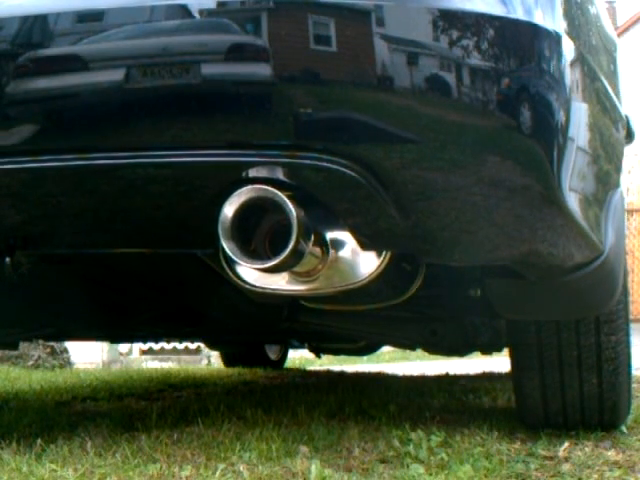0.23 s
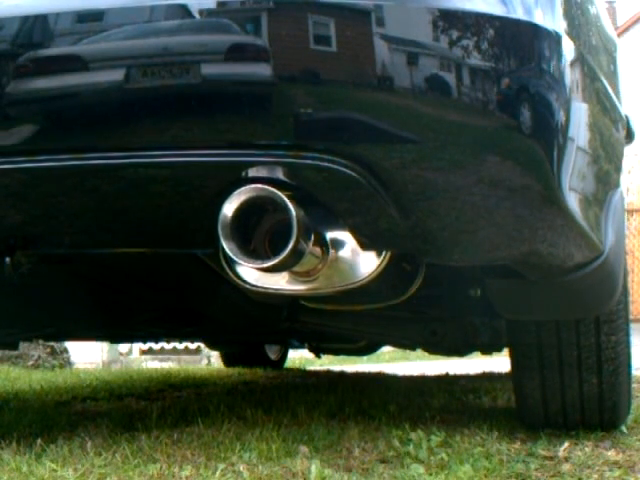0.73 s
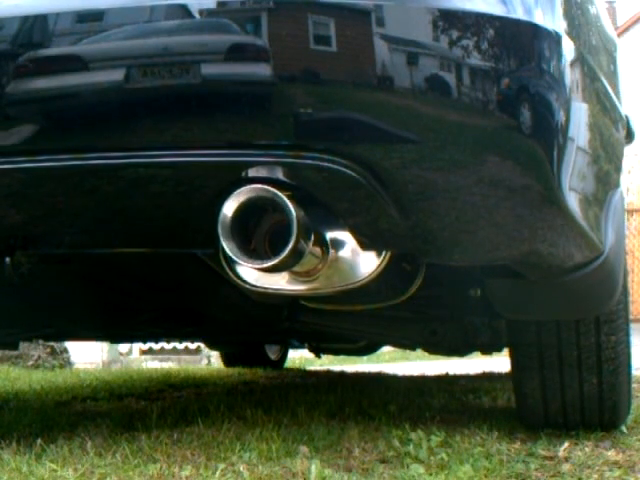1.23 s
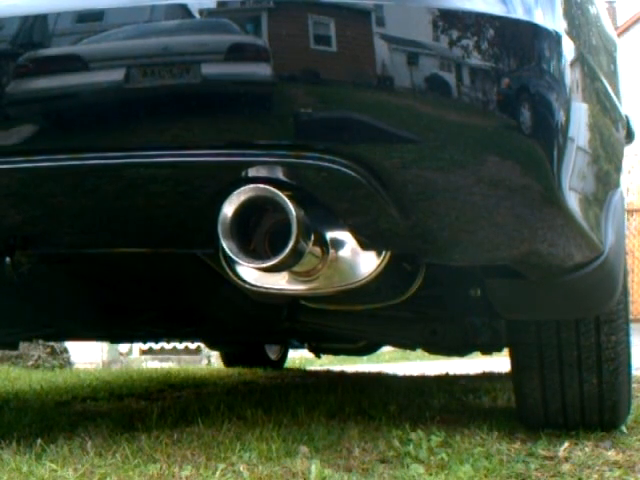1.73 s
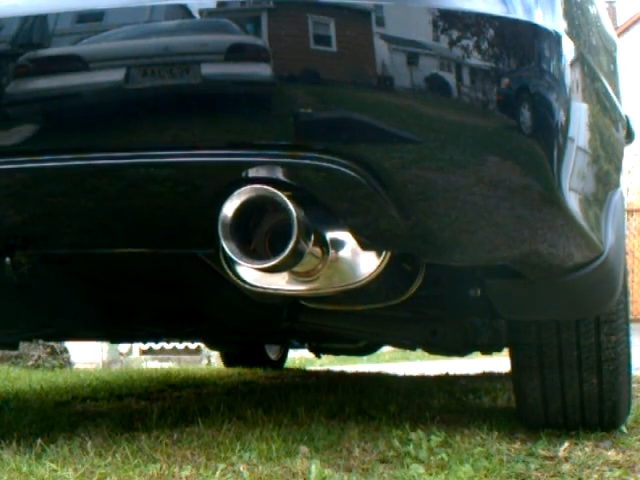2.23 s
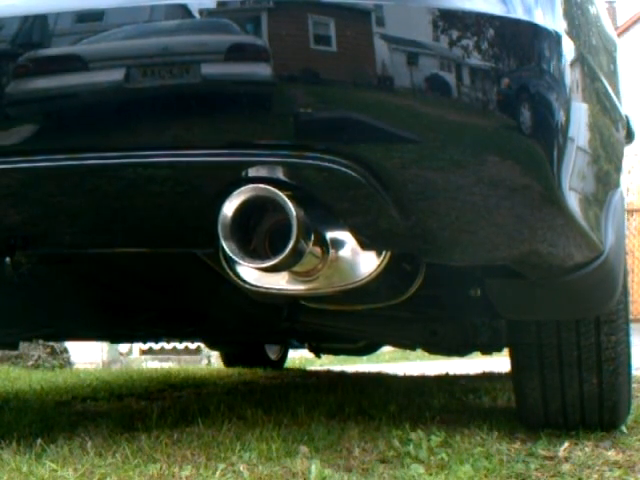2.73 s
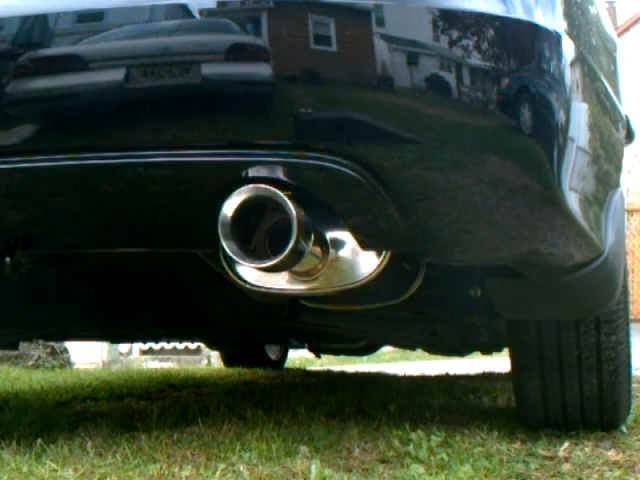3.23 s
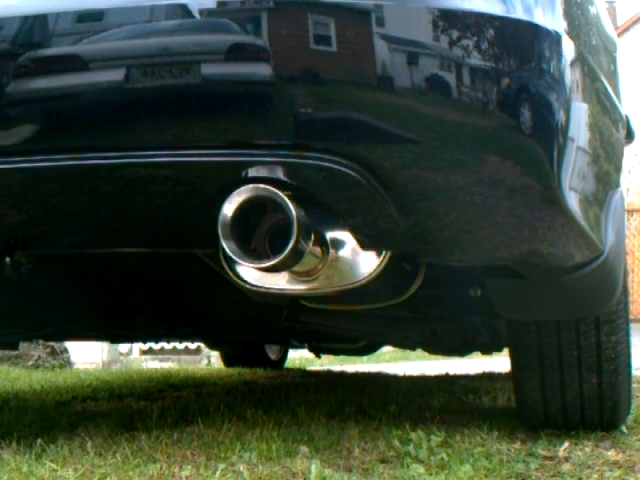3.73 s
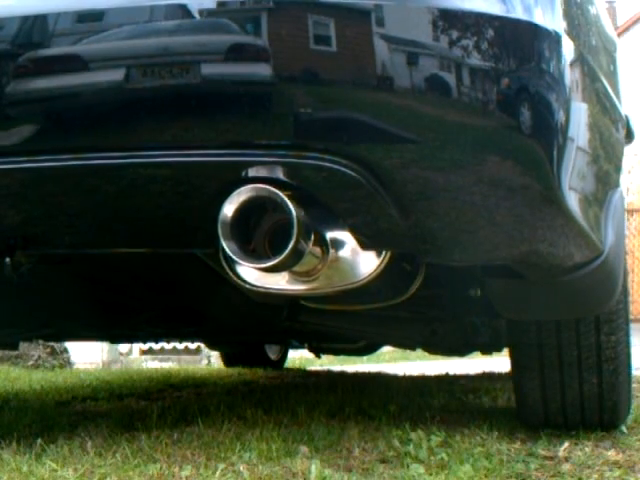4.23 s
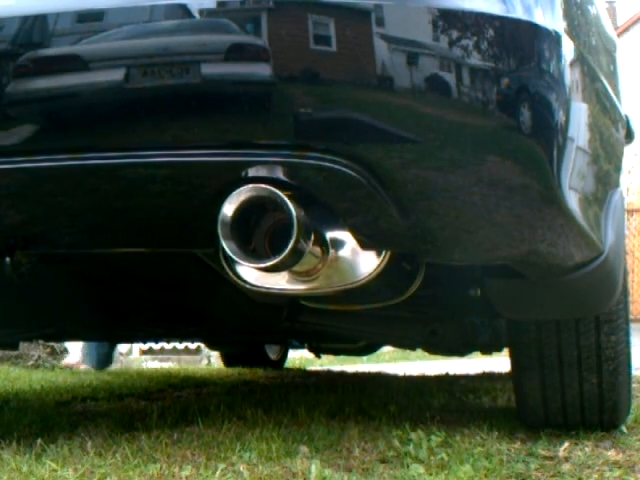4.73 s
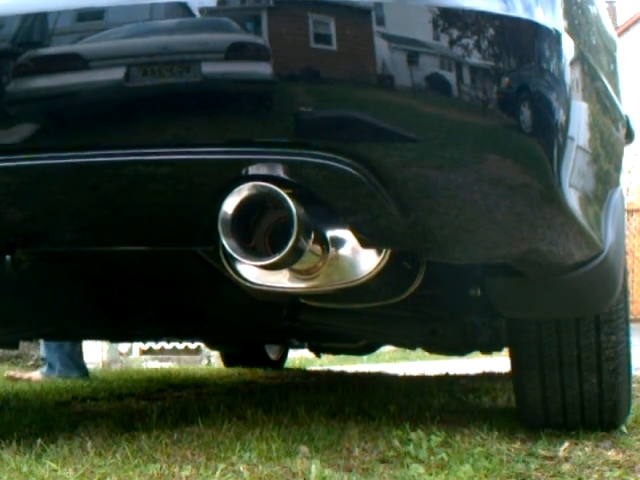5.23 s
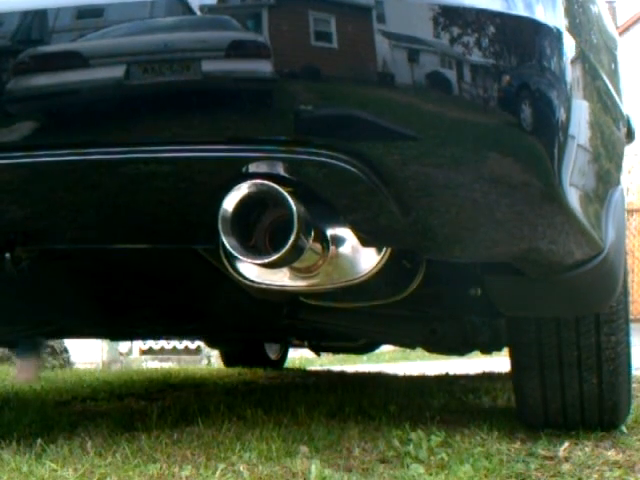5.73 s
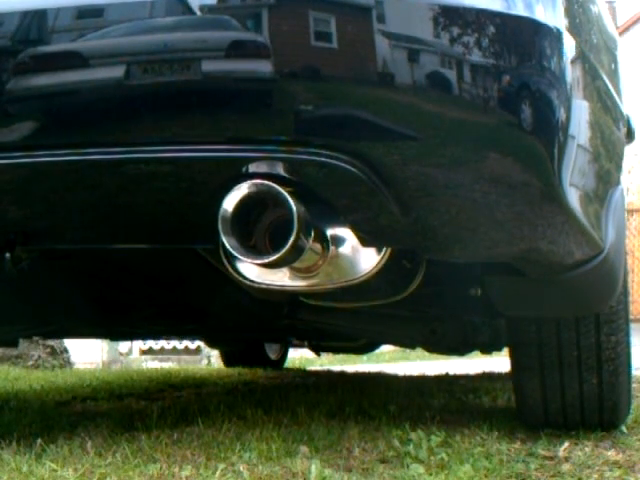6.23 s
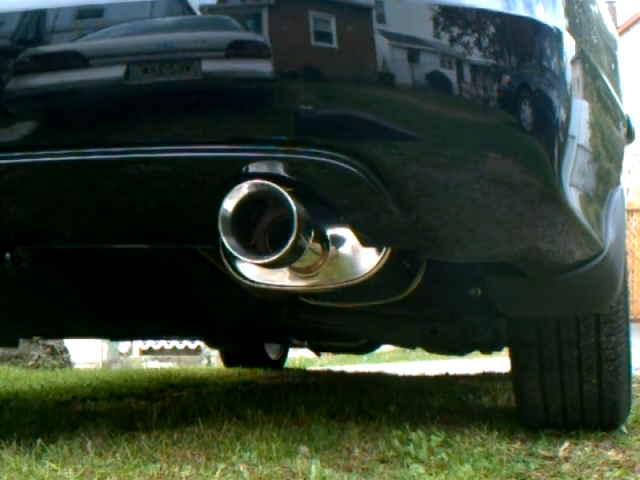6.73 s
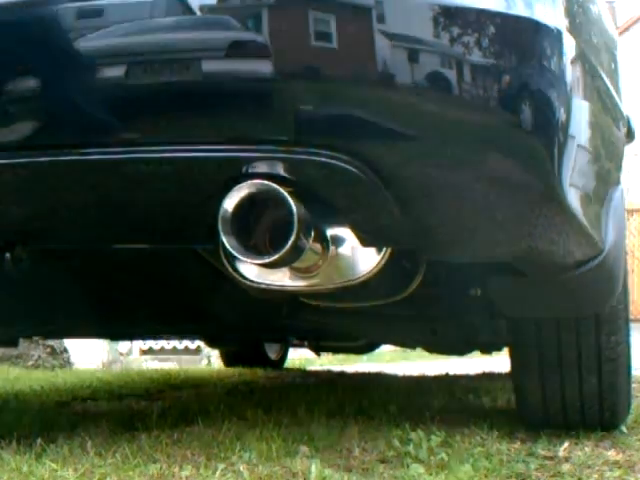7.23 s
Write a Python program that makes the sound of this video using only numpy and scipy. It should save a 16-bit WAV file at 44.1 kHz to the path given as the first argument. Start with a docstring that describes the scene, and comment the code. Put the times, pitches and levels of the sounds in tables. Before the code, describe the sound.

Close at a car's exhaust tip, a four-cylinder engine is blipped three times, each a booming raspy roar, then runs down to a soft puffing idle.

```python
"""Four-cylinder exhaust, three blips and a run-down

A car on a lawn, heard close to its exhaust tip, is blipped three times and then runs down to idle.
Firing pulses boom in the muffler and ring the pipe; gas hisses at the tip and cracks as the throttle opens.
A preamplifier clips the loudest peaks; the sound has little treble and carries a faint whine.
"""
import sys
import numpy as np
from scipy import signal
from scipy.fft import rfft, irfft, next_fast_len
from scipy.io import wavfile

SR = 44100
rng = np.random.default_rng(int(sys.argv[2]) if len(sys.argv) > 2 else 0)


def unload_audio(sound):
    """Save the sound as a 16-bit wav file, at the path given as the first command line argument."""
    columns = np.transpose(np.atleast_2d(sound))
    # keep every value between -1 and 1, then stretch to whole-number steps
    steps = np.round(np.clip(columns, -1, 1) * 32767)
    wavfile.write(sys.argv[1], SR, steps.astype(np.int16))


N = 329191
TIME = np.arange(N) / SR

# Blips of the pedal. Each row: throttle opens in seconds, engine catches in seconds,
# pedal lifts in seconds, drive in firings per second per second.
BLIPS = [(.315, .332, .631, 277.6), (1.365, 1.419, 1.591, 311), (2.205, 2.253, 2.465, 286.6)]
CRUISE_HZ = 100  # reference engine speed; all engine speeds are in firings per second


def amp(db):
    """Decibels to gain."""
    return 10 ** (np.asarray(db) / 20)


def unit(x):
    """Scales to rms 1."""
    return x / np.sqrt(np.mean(x ** 2) + 1e-20)


def noise(spectrum):
    """Noise of rms 1, coloured by (Hz, dB) points."""
    size = next_fast_len(N)
    hz, db = np.transpose(spectrum)
    log_hz = np.log(np.fft.rfftfreq(size, 1 / SR) + 1)
    gain = amp(np.interp(log_hz, np.log(hz), db))
    white = rng.standard_normal(size)
    return unit(irfft(rfft(white) * gain, size)[:N])


def drift(count):
    """Smooth chance of rms 1: count random points a second, joined by lines."""
    points = rng.standard_normal(count * N // SR + 2)
    return unit(np.interp(TIME * count, np.arange(len(points)), points))


def ramp(start_s, length_s):
    """Rises from 0 to 1 in a straight line."""
    return np.clip((TIME - start_s) / length_s, 0, 1)


def bell(centre_s, sigma_s):
    """Gaussian bump of height 1."""
    return np.exp(-((TIME - centre_s) / sigma_s) ** 2 / 2)


def ring(x, hz, width_hz):
    """One resonance of gain 1."""
    return signal.lfilter(*signal.iirpeak(hz, hz / width_hz, SR), x)


def high_pass(x, hz):
    """First-order high pass."""
    return signal.sosfilt(signal.butter(1, hz, "high", fs=SR, output="sos"), x)


def low_pass(x, hz):
    """A steep band limit."""
    taps = signal.firwin(201, hz, window=("kaiser", 7), fs=SR)
    return signal.oaconvolve(x, taps[None], "same")


def engine_speed(steps_per_s=1000):
    """Each blip spins the engine up; friction and speed-squared drag slow it until it settles at idle."""
    start_hz, idle_hz, torque_fade_s, settle_s = 100.66, 22.23, .1837, .3066
    friction_hz_per_s, drag_hz_per_s = 38.465, 7.89  # drag as at CRUISE_HZ
    torque = np.zeros(N)
    for _, catch_s, lift_s, drive in BLIPS:
        torque += drive * (ramp(catch_s, 1 / steps_per_s) - ramp(lift_s, torque_fade_s))
    steps_s = np.arange(0, TIME[-1], 1 / steps_per_s)
    hz, speeds = start_hz, []
    for push in np.interp(steps_s, TIME, torque).tolist():
        running_loss = friction_hz_per_s + drag_hz_per_s * (hz / CRUISE_HZ) ** 2
        loss = min(running_loss, (hz - idle_hz) / settle_s)
        hz += (push - loss) / steps_per_s
        speeds.append(hz)
    return np.interp(TIME, steps_s, speeds)


def load():
    """Throttle and burning, each 0-1: air rushes in first, then the fuel lights; both fade after the lift."""
    attack_s, light_lead_s, light_attack_s = 0.015, .008, 0.0034
    hold_s, release_s = 0.073, .085
    fade = sum(ramp(lift_s + hold_s, release_s) for _, _, lift_s, _ in BLIPS)
    throttle = sum(ramp(opens_s, attack_s) for opens_s, _, _, _ in BLIPS)
    burning = sum(ramp(catch_s - light_lead_s, light_attack_s) for _, catch_s, _, _ in BLIPS)
    return throttle - fade, burning - fade


def idling(shuts_s=6.28, fall_s=0.1):
    """Rises to 1 as the idle valve closes."""
    return ramp(shuts_s, fall_s)


def flow_gain(law, hz, push):
    """Gain from gas flow: follows speed and load, shifts at idle."""
    db, speed_db, load_db, idle_db = law
    return amp(db + speed_db * np.log2(hz / CRUISE_HZ) + load_db * push + idle_db * idling())


def lull():
    """A shallow, slow dip in level midway through the run-down."""
    # Row: centre in seconds, level in dB, Gaussian sigma in seconds.
    dip = (4.22, -2.1, 0.35)
    centre_s, db, sigma_s = dip
    return amp(db * bell(centre_s, sigma_s))


def yard(level_db=-45.5):
    """Outdoor background: steady coloured noise."""
    # Each row: frequency in Hz, relative level in dB.
    yard_spectrum = [(20, -0.5), (80, -1.5), (160, 4), (320, -11), (450, -4.5), (700, -11), (1150, -5),
                     (1600, -15.5), (5500, -27.5)]
    return amp(level_db) * noise(yard_spectrum)


def knocks(width_hz=420):
    """Soft knocks on the car: noise through a broad resonance, quickly damped."""
    # Each row: start in seconds, level in dB, resonance in Hz, decay in seconds.
    knock_table = [(7.1, -31, 460, .022), (7.191, -32.5, 680, .016), (7.425, -38, 330, .018)]
    rattle = noise([(100, -4), (300, 7.5), (1000, 0), (3500, -22)])
    out = np.zeros(N)
    for start_s, db, hz, decay_s in knock_table:
        envelope = (TIME > start_s) * np.exp(-abs(TIME - start_s) / decay_s)
        out += amp(db) * envelope * unit(ring(rattle, hz, width_hz))
    return out


def buffet(hz, level_db=-37):
    """The jet from the tip stirs the air: low noise, louder with speed."""
    stir = noise([(15, 3.5), (45, -1.0), (120, -8.0), (250, -10.0), (600, -43)])
    return amp(level_db) * hz / 200 * stir


def cracks():
    """Short bursts of gas noise as the throttle opens."""
    # Each row: centre in seconds, level in dB, Gaussian sigma in seconds.
    crack_table = [(0.33, -2.5, 0.0069), (1.419, 2.5, 0.0066), (2.253, 3, 0.0064)]
    gas = noise([(60, 4), (550, 24.5), (900, -3), (1600, 0), (2800, 9), (4200, -5.5), (5600, -9.5)])
    return sum(amp(db) * bell(s, sigma_s) for s, db, sigma_s in crack_table) * gas


def thuds():
    """Low thuds of uneven burning: brief, inverted cosine pulses."""
    # Each row: centre in seconds, level in dB, frequency in Hz, Gaussian sigma in seconds.
    thud_table = [(0.33, -3.5, 62.7, 0.0062), (0.747, -9, 48, 0.0073), (0.941, -4, 61, 0.0054),
                  (1.424, -7, 61.5, 0.0059), (1.7, -6.5, 49, 0.013), (2.253, 3.5, 58.4, 0.0056),
                  (2.575, 0.5, 52, 0.0052)]
    out = np.zeros(N)
    for s, db, hz, sigma_s in thud_table:
        out -= amp(db) * bell(s, sigma_s) * np.cos(2 * np.pi * hz * (TIME - s))
    return out


def burst(turns, centre, width):
    """A bump once in every firing cycle."""
    return np.exp(-(((turns - centre + .5) % 1 - .5) / width) ** 2)


def gas_noise(turns, hz, throttle, burning, intake_db=4.5, flutter_db=0.86, churn_db=-28,
              steady=2.0, leak=0.24):
    """Gas hisses from the tip in step with the firings and churns in the muffler under load."""
    # Hiss of fast gas. Each row: frequency in Hz, relative level in dB.
    rush_spectrum = [(150, -49), (400, 7), (1400, 2.5), (2000, -1), (2900, -3), (3600, -6), (4700, -8),
                     (5600, -15)]
    # Hiss of slow puffs. Each row: frequency in Hz, relative level in dB.
    puff_spectrum = [(100, -18), (300, 8.5), (1000, -1), (1600, -16.5), (2200, 2.5), (3000, 0), (3900, -6),
                     (4700, -7), (5400, -8.5)]
    # Each law: level at CRUISE_HZ in dB, dB per doubling of speed, extra under load in dB,
    # change at idle in dB.
    hiss_law = (-30.5, 11.5, 0.7, -5)
    puff_law = (-33.5, -2, 0, -17.5)
    # Puff hiss, as the flow swells and at its crest. Each row: place in the firing cycle,
    # width in cycles, strength.
    chuff_table = [(-.33, 0.14, 0.93), (.08, 0.12, 1.04)]
    valve_opens_s, valve_rise_s = 5.19, 0.46  # the idle valve lets in extra air

    gate = unit(steady + burst(turns, centre=0.12, width=0.51))
    rush_gain = flow_gain(hiss_law, hz, burning) * amp(intake_db * throttle) * lull()
    rush = rush_gain * gate * noise(rush_spectrum)

    bumps = sum(strength * burst(turns, centre, width) for centre, width, strength in chuff_table)
    puff_gain = ramp(valve_opens_s, valve_rise_s) * flow_gain(puff_law, hz, burning)
    puffs = puff_gain * unit(leak + bumps) * noise(puff_spectrum)

    churn = burning * noise([(20, -17.5), (90, 12), (500, -10.0), (900, -19.5), (2500, -29.5)])
    return amp(flutter_db * drift(count=70)) * (rush + puffs) + amp(churn_db) * churn


def idle(turns, hz, level_db=-21.5, width_s=0.0037, lead=0.1, uneven=0.05, push=0.098):
    """At idle each puff stands alone: a short suck, then a push."""
    u = ((turns + lead + .5) % 1 - .5) / hz / width_s
    alternation = 1 + uneven * np.cos(np.pi * turns)
    puff = (u + push) * np.exp(-u ** 2 / 2) * alternation
    fade = np.interp(TIME, [6.15, 6.45], [0, 1])
    return amp(level_db) * fade * high_pass(puff, 10)


def firings(turns, hz, throttle, wander=0.11, wander_s=.00006):
    """One pulse per firing; the cylinders differ, more so under load, and each wanders slowly."""
    # In firing order. Each row: strength, extra travel time in seconds.
    cylinders = [(1.35, 0), (.72, .00017), (1.2, .00013), (.75, .00023)]
    at = np.flatnonzero(np.diff(np.floor(turns)))
    cylinder = np.floor(turns[at]).astype(int) % len(cylinders)
    strength, travel_s = np.transpose(cylinders)[:, cylinder]
    size = np.choose(cylinder, [drift(count=6)[at] for _ in cylinders])
    late = np.choose(cylinder, [drift(count=6)[at] for _ in cylinders])

    imbalance = np.interp(hz[at], [45, 100], [.35, 1]) + .5 * throttle[at]
    strength = strength ** imbalance * (1 + wander * size)
    travel_s = (travel_s - travel_s.mean()) * imbalance ** 2 + wander_s * late
    place = np.clip(at + travel_s * SR, 0, N - 1).round().astype(int)
    pulses = np.bincount(place, strength / strength.mean(), N) * SR / hz
    # the four lowest multiples of the firing rate belong to the boom
    low = 1 + 2 * sum(np.cos(2 * np.pi * k * turns) for k in range(1, 5))
    return unit((pulses - low) * np.sqrt(hz))


def echoes(x, trip_s=.0135, back=0.25):
    """Sound runs back and forth in the pipe, so gliding orders swell and fade."""
    return x + sum((-back) ** k * np.interp(TIME - k * trip_s, TIME, x, left=0) for k in range(1, 3))


def pipe(x, modes, low_hz, high_hz):
    """Resonances of alternating sign, with steep skirts on both sides."""
    rung = np.zeros(N)
    for k, (hz, width_hz, db) in enumerate(modes):
        rung += (-1) ** k * amp(db) * ring(x, hz, width_hz)
    skirts = signal.butter(3, [low_hz, high_hz], "band", fs=SR, output="sos")
    return unit(signal.sosfilt(skirts, rung))


def tailpipe(turns, hz, throttle, flutter_db=1.14):
    """Firing pulses and turbulence ring muffler and pipe: darker when slow, harder under load."""
    # Resonances. Each row: frequency in Hz, width in Hz, level in dB.
    muffler_modes = [(140, 65, -9.5), (204, 39, -11), (284.8, 40, -3)]
    bark_modes = [(324, 98, -13), (447, 48, 0), (553, 114, 2.5), (607, 110, 1), (713, 17, -8.5)]
    rasp_modes = [(779, 99, -3.5), (944, 84, 1.5), (1080, 32, 3), (1183, 59.4, 8), (1301, 124, -2.5),
                  (1570, 470, -27.5), (1910, 110, -17.5)]
    # Each law: level at CRUISE_HZ in dB, dB per doubling of speed, extra under load in dB,
    # change at idle in dB.
    drone_law = (-29.5, 6.5, 6, -17)
    bark_law = (-32.5, 5.5, 9.5, -15)
    rasp_law = (-28, 11.5, 0, -2)

    pulses = unit(echoes(firings(turns, hz, throttle)))
    swirl = rng.standard_normal(N)
    low_rough = np.interp(hz, [35, 70, 140], [.28, .17, .15]) + .04 * throttle
    high_rough = np.interp(hz, [50, 110, 180], [1.4, .6, .4]) + .15 * throttle
    low_drive = (pulses + low_rough * swirl) / np.hypot(1, low_rough)
    high_drive = (pulses + high_rough * swirl) / np.hypot(1, high_rough)

    drone = flow_gain(drone_law, hz, throttle) * pipe(low_drive, muffler_modes, low_hz=104, high_hz=408)
    bark = flow_gain(bark_law, hz, throttle) * pipe(low_drive, bark_modes, low_hz=307, high_hz=880)
    rasp_gain = flow_gain(rasp_law, hz, throttle) * lull() * amp(flutter_db * drift(count=25))
    rasp = rasp_gain * pipe(high_drive, rasp_modes, low_hz=647, high_hz=2520)
    return drone + bark + rasp


def exhaust_gain(hz):
    """How strongly the standing waves of the whole exhaust pass a tone."""
    # Each row: frequency in Hz, width in Hz, level in dB.
    standing_waves = [(40.4, 11, -13), (61.5, 21, -7.5), (84.3, 30, -10.5), (122, 55, -19),
                      (180.6, 36, -16), (208.3, 34, -14.5), (293.5, 84, -2.5), (406, 41, -10),
                      (483, 77, -5.5), (573.4, 78, -0.5), (777, 230, -5), (930, 64, -1.5)]
    grid_hz = np.arange(1100)
    power = np.zeros(len(grid_hz))
    for centre_hz, width_hz, db in standing_waves:
        power += amp(db) ** 2 / (1 + (2 * (grid_hz - centre_hz) / width_hz) ** 2) ** 2
    return np.interp(hz, grid_hz, np.sqrt(power))


def swell_db(order):
    """The brief swells and fades of one order as it glides."""
    # Each row: centre in seconds, multiple of the firing rate, level in dB, Gaussian sigma in seconds.
    swell_table = [(0.75, 1, -12, 0.019), (.83, 2, 7.5, .04), (.84, 3.5, 12.5, 0.063),
                   (1.157, 1, -14, 0.034), (1.52, 1, 3.5, 0.028), (1.603, 2, 9, 0.049),
                   (2.01, 2, -6.5, 0.11), (2.34, 2, 5.5, 0.048), (2.345, 3, 5.5, .05),
                   (2.508, 1, -12, .025), (2.757, 2, 13.5, 0.12), (2.857, 4.5, 14, .05),
                   (3.13, 2.5, 10, .06), (3.2, 3, 2.5, 0.13), (3.672, 1, -6, .05), (3.87, 4, 6.5, .05),
                   (6.1, 2, 2.5, 0.11)]
    return sum(db * bell(s, sigma_s) for s, k, db, sigma_s in swell_table if round(2 * k) / 2 == order)


def boom(turns, hz, throttle, burning, lag=0.185, dispersion=.12, surge=1.62, idle_db=-12):
    """The lowest orders pass as near sines that swell on each standing wave, less steady under load."""
    # Each row: multiple of the firing rate, level at CRUISE_HZ in dB, dB per doubling of speed,
    # extra under load in dB, slow sway in dB at CRUISE_HZ.
    order_table = [(1 / 2, -22.5, 8.5, 4, 0.91), (1, 0.49, 0.59, 7.3, .4), (3 / 2, -27, 3.8, 3.4, 2.1),
                   (2, -16.5, -1, 8.5, 1.9), (5 / 2, -35.5, 2.5, 11, 1.3), (3, -22.5, .5, 11.5, 0.98),
                   (7 / 2, -38, 2.3, 12.4, 1.5), (4, -24.5, 1.5, 7.5, 1.4), (9 / 2, -39, 3.5, 15.6, 1.8)]
    shake = .025 + .13 * burning
    doublings = np.log2(hz / CRUISE_HZ)
    out = np.zeros(N)
    for multiple, db, speed_db, load_db, sway_db in order_table:
        k = round(2 * multiple) / 2
        # the first gulp of air lifts the firing order
        push = burning + surge * (throttle - burning) * (k == 1)
        # the pipe smears each pulse, so the orders arrive out of step
        spread = dispersion * (k - 1) * (k - 2)
        sway = swell_db(k) + sway_db * hz / CRUISE_HZ * drift(count=12)
        level = exhaust_gain(k * hz) * amp(db + speed_db * doublings + load_db * push + sway)
        tone = np.cos(2 * np.pi * (k * (turns + lag * throttle) + spread))
        out += level * (1 + shake * drift(count=60)) * tone
    return np.sqrt(2) * amp(idle_db * idling()) * out


def scene(idle_beat_s=7.023):
    """The engine speed and the load drive the exhaust; yard and knocks lie beside it."""
    hz = engine_speed()
    throttle, burning = load()
    turns = np.cumsum(hz) / SR  # firings so far
    turns -= np.interp(idle_beat_s, TIME, turns)  # a firing falls on idle_beat_s
    background = yard() + knocks()
    gas = buffet(hz) + cracks() + thuds() + gas_noise(turns, hz, throttle, burning)
    tones = idle(turns, hz) + tailpipe(turns, hz, burning) + boom(turns, hz, throttle, burning)
    return (background + gas + tones)[None]


def record(dry, preamp_ceiling=0.72, final_ceiling=.71, mic_edge_hz=5800, edge_hz=15900):
    """The preamplifier clips; a dull band limit, a faint whine, a hard ceiling and a last band limit follow."""
    # Each row: whine frequency in Hz, rms level in dB.
    whine_table = [(2000, -55.5), (4000, -55.5)]
    heard = low_pass(np.clip(dry, -preamp_ceiling, preamp_ceiling), mic_edge_hz)
    whine = sum(np.sqrt(2) * amp(db) * np.sin(2 * np.pi * hz * TIME) for hz, db in whine_table)
    return low_pass(np.clip(heard + whine, -final_ceiling, final_ceiling), edge_hz)


dry = scene()
out = record(dry)
unload_audio(out)
```